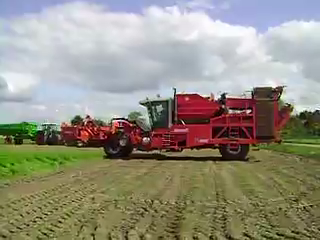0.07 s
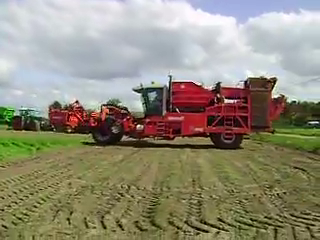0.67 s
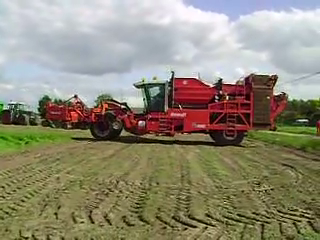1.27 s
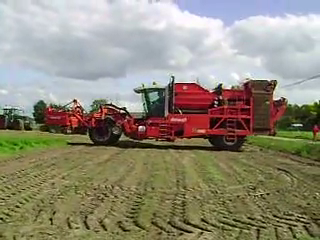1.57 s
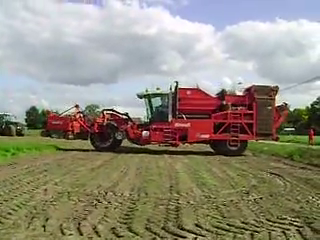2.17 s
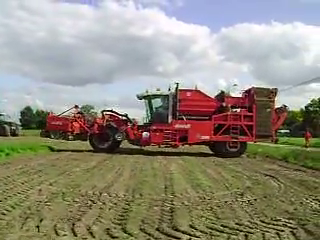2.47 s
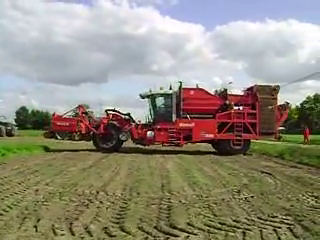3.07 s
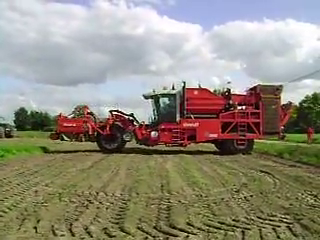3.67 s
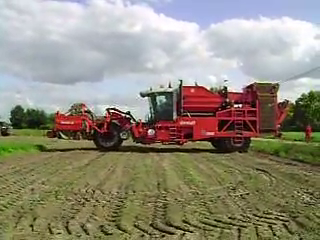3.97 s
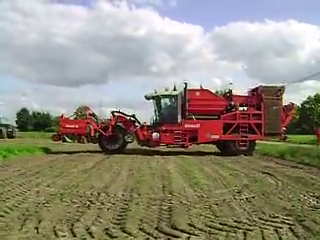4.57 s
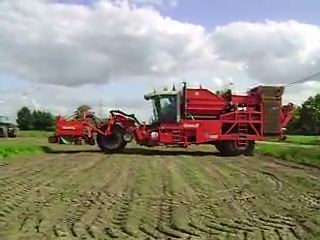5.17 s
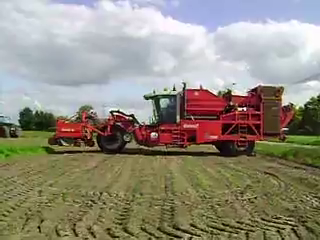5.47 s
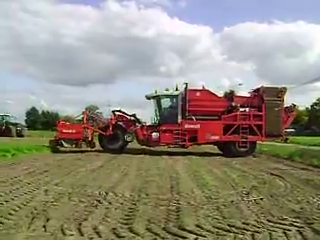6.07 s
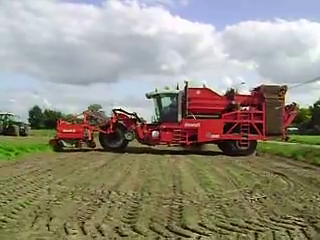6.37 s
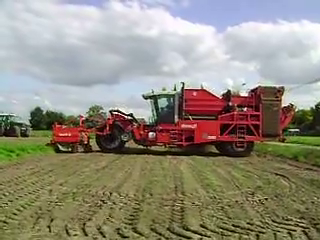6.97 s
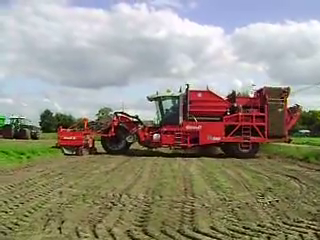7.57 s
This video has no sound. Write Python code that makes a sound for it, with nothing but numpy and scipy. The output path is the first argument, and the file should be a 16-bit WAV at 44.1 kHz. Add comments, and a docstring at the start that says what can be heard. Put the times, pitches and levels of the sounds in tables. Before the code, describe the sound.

Outdoors on a gusty field, a harvester's diesel engine drones with a booming exhaust and a grainy rush of machinery. Through the middle, ragged wind buffets and overloads the small microphone, partly covering the engine as it slows and drops in pitch. The engine then picks up speed again and runs steadily as the gusts fade, with a rising level of whine and a few faint, brief belt squeals.

```python
"""An open field on a gusty day, with a big diesel harvester working some way off.
Its exhaust throbs and booms as the engine sags under load and picks up again. Gears and a pump whine
in step with it, belts and bearings sing, and the conveyors rattle and clank.
Close up, wind rumbles, tears and slaps at the microphone of a small camera,
which overloads and keeps little treble."""
import sys
import numpy as np
from scipy.fft import rfft, irfft, next_fast_len
from scipy.io import wavfile
from scipy.ndimage import uniform_filter1d, map_coordinates

SR = 44100
rng = np.random.default_rng(int(sys.argv[2]) if len(sys.argv) > 2 else 0)


def inscribe(sig):
    """Save sig as 16-bit PCM at rate SR to the path in sys.argv[1].

    A 1-D sig is mono; a 2-D sig holds one channel per row.
    Samples are clipped to [-1, 1] before scaling.
    """
    pcm = np.round(np.clip(np.atleast_2d(sig).T, -1, 1) * 32767)
    wavfile.write(sys.argv[1], SR, pcm.astype(np.int16))


N = 344421
TIME_S = np.arange(N) / SR


def amp(db):
    """Decibels to gain."""
    return 10 ** (np.asarray(db) / 20)


def unit(x):
    """x scaled to rms 1."""
    return x / np.sqrt(np.mean(x ** 2) + 1e-20)


def noise():
    """White noise."""
    return rng.standard_normal(N)


def curves(rows):
    """One value per sample for each column after the time."""
    times, *columns = np.transpose(rows)
    return [np.interp(TIME_S, times, column) for column in columns]


def wobble(rate):
    """A smooth random curve, rate knots a second."""
    return map_coordinates(rng.standard_normal(int(N * rate / SR) + 4), [TIME_S * rate])


def swell(middle, length):
    """A rounded rise and fall of height 1."""
    return np.sqrt(np.maximum(1 - (2 * (TIME_S - middle) / length) ** 2, 0))


def swells(rows):
    """The joint gain of swells whose powers add."""
    return np.sqrt(sum((amp(db) * swell(middle, length)) ** 2 for middle, length, db in rows))


def filtered(x, response):
    """x through a frequency response."""
    size = next_fast_len(N + SR // 2)
    return irfft(rfft(x, size) * response(np.fft.rfftfreq(size, 1 / SR)), size)[:N]


def coloured(x, points):
    """x shaped by (freq_hz, level_db) points on a log axis, at rms 1."""
    freqs, db = np.transpose(points)
    return unit(filtered(x, lambda hz: amp(np.interp(np.log(hz + 1), np.log(freqs), db))))


def tones(firings, orders, waver_db, drift_rad, rate):
    """Tones locked to the crankshaft, each wavering in level and phase."""
    out = np.zeros(N)
    for order, db in orders:
        gain = amp(db + waver_db * wobble(rate))
        phase = 2 * np.pi * (order * firings + rng.random())
        out += gain * np.sin(phase + drift_rad * wobble(rate))
    return np.sqrt(2) * out


# Gusts striking the microphone: start_s, hold_s, level_db
GUSTS = [(0.079, 0.12, -21), (2.049, 0.073, -13), (2.236, 0.089, -14.5), (2.405, .05, -12.5),
         (2.63, .03, -19), (2.748, 0.16, -19), (3.071, .08, -13), (3.221, .18, -15.5), (3.442, 0.19, -13.5),
         (3.855, 0.2, -22), (4.098, 0.035, -17), (4.248, 0.011, -19.5), (4.33, 0.037, -20),
         (4.478, .11, -12), (4.774, 0.028, -15.5), (5.083, 0.03, -16.5), (5.595, 0.022, -17),
         (5.792, .14, -18), (6.03, .04, -16.5), (6.372, 0.023, -22), (7.184, 0.04, -20.5)]

def gusts(attack_s=0.032, release_s=0.035):
    """Wind strength: each gust rises quickly, holds and dies away; their powers add."""
    power = np.zeros(N)
    for start, hold, db in GUSTS:
        rise = np.clip(1 + (TIME_S - start) / attack_s, 0, 1)
        fall = np.exp(-np.maximum(TIME_S - start - hold, 0) / release_s)
        power += (amp(db) * rise * fall) ** 2
    return np.sqrt(power)


# The breeze between gusts: time_s, level_db
BREEZE = [(.3, -22.5), (.8, -30.5), (1.5, -30), (2, -22), (3, -19.5), (3.75, -16.5), (4.2, -22.5),
          (4.7, -16.5), (5.6, -19.5), (6.1, -22), (6.7, -32.5), (7.8, -31.5)]
# Slow eddies around the camera: time_s, relative_db
EDDIES = [(0.07, -39.5), (1.21, -51), (2.31, -20.5), (2.95, -35), (3.0, -28), (4.83, -32.5), (5.0, -44.5),
          (6.1, -32), (6.79, -46), (7.15, -31), (7.8, -38)]
# Air tearing at the microphone port: freq_hz, density_db
TEARING_SPECTRUM = [(40, -14.5), (95, 1.5), (170, 2), (300, 2), (800, -2.5), (1200, -7), (1700, -13.5),
                    (2500, -23), (3800, -31), (5200, -32.5), (6000, -52)]
# The eddies' rumble: freq_hz, density_db
RUMBLE_SPECTRUM = [(10, -19), (25, -2), (45, 0.5), (90, -3.5), (160, -7), (400, -24.5), (1500, -59)]

def wind(pops_per_s=330):
    """Right on the microphone, eddies rumble while breeze and gusts tear in ragged bursts."""
    gust = gusts()
    flow = np.hypot(amp(curves(BREEZE)[0] + 0.88 * wobble(14)), gust)
    ragged = amp(1.87 * wobble(130) + 0.55 * wobble(28))
    tearing = amp(1) * coloured(noise() * ragged, TEARING_SPECTRUM)
    # the overloaded microphone crackles in dense fine pops that grow with the wind
    pops = (rng.random(N) < pops_per_s / SR) * np.sign(noise()) * rng.uniform(0.24, 1, N)
    crackle = amp(-14) * coloured(pops * ragged, [(300, -5.5), (1200, 6), (2600, 6.5), (5200, -1)])
    eddy_gain = np.hypot(amp(curves(EDDIES)[0] + 3.5), amp(-12.5) * gust)
    rumble = eddy_gain * coloured(noise() * amp(2.2 * wobble(13)), RUMBLE_SPECTRUM)
    return flow * (tearing + crackle) + rumble


# Slaps of air on the microphone: start_s, level_db
SLAPS = [(2.0712, -13), (2.309, -15), (2.4264, -12), (2.6244, -12.5), (3.114, -9.5), (3.4469, -9.5),
         (3.4873, -6), (3.5508, -11.5), (3.6499, -11), (3.8105, -13), (4.5475, -10.5), (4.564, -9),
         (4.774, -13.5), (5.1311, -15.5), (5.9824, -15), (6.042, -15.5)]

def air_slaps(t60_s=0.015):
    """The hardest eddies hit the port as brief, broad cracks."""
    bursts, t = np.zeros(N + SR), np.arange(SR // 12) / SR
    for start, db in SLAPS:
        bursts[round(start * SR):][:len(t)] += amp(db - 60 * t / t60_s)
    return bursts[:N] * coloured(noise(), [(100, 0), (900, -1), (2400, -6), (5500, -9), (8000, -30)])


# Thin squeals from across the field: middle_s, length_s, pitch_hz, glide_hz_per_s, level_db
SQUEALS = [(0.177, 0.51, 2344, -1, -42), (0.192, 0.48, 1610, 1, -37.5), (0.516, 0.23, 1328, -40, -36),
           (0.786, 0.63, 1360, -42, -42), (4.98, 0.4, 2270, 88.5, -39), (5.209, 0.38, 2925, 28, -44),
           (6.52, 0.59, 1290, 3, -35), (7.738, 0.25, 1610, 27.5, -31.5)]

def squeals():
    """Belts and bearings sing for a moment, sliding a little in pitch."""
    out = np.zeros(N)
    for middle, length, hz, glide, db in SQUEALS:
        t = TIME_S - middle
        phase = 2 * np.pi * (hz + glide * t / 2) * t
        out += amp(db) * swell(middle, length) * np.sin(phase + .4 * wobble(25))
    return np.sqrt(2) * out


# Blows on the conveyor: start_s, relative_db
CLANKS = [(0.195, -13), (0.3537, -6.5)]
# The modes of its steel: pitch_hz, level_db, t60_s
STEEL_MODES = [(1690, -2, 0.044), (2724, -4.5, 0.034), (2940, -4.5, 0.034), (3530, -8.5, 0.028),
               (4700, -7, .03)]

def conveyor_clanks(gain_db=-12.5, crack_t60_s=0.011):
    """Short blows crack against the conveyor and ring its steel."""
    out, t = np.zeros(N + SR), np.arange(SR // 8) / SR
    for start, db in CLANKS:
        ring = sum(amp(level - 60 * t / t60) * np.sin(2 * np.pi * (hz * t + rng.random()))
                   for hz, level, t60 in STEEL_MODES)
        crack = 1.5 * amp(-60 * t / crack_t60_s) * rng.standard_normal(len(t))
        out[round(start * SR):][:len(t)] += amp(db + gain_db) * (ring + crack)
    return out[:N]


# The hydraulic drive taking up load near the end: time_s, level_db
PUMP_LEVEL = [(0, -46), (2, -50), (5.8, -50), (6.4, -41), (7.15, -41), (7.35, -30), (7.8, -28.5)]
# Its tones: firing_multiple, relative_db
PUMP_TONES = [(8.5, 1.5), (17, -13), (18.42, -13), (6.33, -18.5)]

def hydraulic_pump(firings):
    """The pump whines in step with the engine."""
    return amp(curves(PUMP_LEVEL)[0]) * tones(firings, PUMP_TONES, waver_db=3, drift_rad=.15, rate=13)


# Swells of gear whine: middle_s, length_s, level_db
WHINE_SWELLS = [(.28, .8, -36), (1.8, 1, -43), (2.95, .5, -37), (4.5, 1.2, -37.5), (4.8, .14, -32),
                (5.6, .9, -37), (6.54, .15, -30.5), (6.85, .3, -32), (7.6, .7, -30)]
# Shafts geared to the engine: firing_multiple, relative_db
GEAR_TONES = [(22.63, 1), (24.95, -14), (25.5, -16), (38.2, -12.5)]

def gear_whine(firings, floor_db=-50):
    """The gears follow the engine's speed, always faintly there and swelling now and then."""
    gain = np.hypot(amp(floor_db), swells(WHINE_SWELLS))
    return gain * tones(firings, GEAR_TONES, waver_db=1.6, drift_rad=.25, rate=25)


def clatter(firings, cylinders=6, size=3072, knock_gain=0.26):
    """Noise plus each cylinder's own ragged knock, which returns every engine cycle."""
    hiss, cycle = noise(), rng.standard_normal(size)
    knock = unit(map_coordinates(cycle, [(firings / cylinders % 1) * size], mode="grid-wrap"))
    return hiss + knock_gain * knock


# An engine bay panel, louder as it comes into line with the microphone: time_s, level_db
PANEL_LEVEL = [(0, -30.5), (0.5, -45.5), (0.9, -56.5), (5.5, -43.5), (6.5, -35.5), (7.2, -32), (7.8, -31)]

def bay_panel(firings, centre_hz=1975, width_hz=510):
    """Each firing shakes a panel, which rings in one steep-sided resonance."""
    def resonance(hz):
        damping = 1j * hz * width_hz
        return (damping / (centre_hz ** 2 - hz ** 2 + damping)) ** 2
    shaking = clatter(firings) * amp(2.4 * np.cos(2 * np.pi * firings))
    return amp(curves(PANEL_LEVEL)[0]) * unit(filtered(shaking, resonance))


# The level of the machinery's rush, dipping and surging during the gusts: time_s, relative_db
RUSH_LEVEL = [(0.3, -34), (0.74, -37.5), (2.07, -36), (2.24, -34.5), (2.66, -38.5), (3.43, -32.5),
              (4.23, -41), (4.6, -36), (7.25, -32.5), (7.8, -31)]
# Fan, belts and conveyors together: freq_hz, density_db
RUSH_SPECTRUM = [(30, -13), (105, -9.5), (290, 2), (420, -8.5), (650, -1), (860, -5.5), (1100, -2),
                 (1480, -10), (2100, -10), (2500, -21), (3400, -16), (4300, -18.5), (5100, -17.5),
                 (6000, -35)]

def machinery_rush(firings, gain_db=9.5):
    """The machinery's rush pulses with each firing; chains and stones make it grainy."""
    shaking = clatter(firings)
    rattle = amp(1.7 * np.cos(2 * np.pi * firings) + 1.6 * wobble(250) + 1.2 * wobble(23))
    return amp(curves(RUSH_LEVEL)[0] + gain_db) * coloured(shaking * rattle, RUSH_SPECTRUM)


def effort_db(firing_hz, cruise_hz=86, db_per_hz=0.88, throttle_db=3, full_throttle_hz_per_s=14):
    """The exhaust grows with engine speed, and with the throttle that speeds it up."""
    rise_hz_per_s = uniform_filter1d(np.gradient(firing_hz) * SR, SR // 5)
    throttle = np.tanh(rise_hz_per_s / full_throttle_hz_per_s)
    return db_per_hz * (firing_hz - cruise_hz) + throttle_db * throttle


# The tailpipe's slowly drifting levels at cruising speed: time_s, throb_db, boom_db
TAILPIPE = [(0, -19, -22.5), (2.4, -17.5, -25.5), (5.8, -19.5, -24.5), (7.4, -17.5, -26)]
# The throb's tones: firing_multiple, relative_db
EXHAUST_TONES = [(1, 0), (5 / 3, -14), (2, -11.5), (8 / 3, -15), (10 / 3, -25.5), (4, -23), (6, -21)]
# A bark as the governor catches the sag: middle_s, length_s, level_db
BARKS = [(3.88, .16, -21.5)]
# The silencer booming out briefly: middle_s, length_s, level_db
BOOM_SWELLS = [(.15, 0.14, -18.5), (1.33, .1, -20), (3.58, .14, -16.5), (6.63, 0.091, -19.5)]
# Gas in the silencer: freq_hz, density_db
BOOM_SPECTRUM = [(90, -36.5), (116, -15.5), (134, 1), (152, -2), (176, -2), (196, -12), (260, -24.5),
                 (400, -48.5)]

def exhaust(firings, effort, boom_follows=0.34):
    """Every firing pushes a puff from the tailpipe, and turbulent gas booms in the silencer."""
    throb_db, boom_db = curves(TAILPIPE)
    throb_gain = amp(throb_db + effort) + swells(BARKS)
    throb = throb_gain * tones(firings, EXHAUST_TONES, waver_db=.5, drift_rad=0.046, rate=25)
    boom_gain = np.hypot(amp(boom_db + boom_follows * effort + 2.5 * wobble(10)), swells(BOOM_SWELLS))
    return throb + boom_gain * coloured(noise(), BOOM_SPECTRUM)


# The diesel sags under load, recovers slowly, then revs up: time_s, firing_hz
ENGINE_SPEED = [(.3, 88.9), (1.3, 83.26), (2.65, 83.05), (3.7, 70.46), (4.7, 75.7), (5.65, 78.04),
                (5.92, 86.45), (6.4, 85.86), (7.8, 86.05)]

def harvester():
    """One diesel paces the exhaust, machinery, panel, gears and pump."""
    firing_hz, = curves(ENGINE_SPEED)
    firings = np.cumsum(firing_hz * (1 + .0008 * wobble(12))) / SR  # running count
    return (exhaust(firings, effort_db(firing_hz)) + machinery_rush(firings) + bay_panel(firings)
            + gear_whine(firings) + hydraulic_pump(firings))


def scene():
    """The machine across the field and the wind at the microphone, in mono."""
    return (harvester() + squeals() + conveyor_clanks() + wind() + air_slaps())[None]


def record(dry, on_s=0.056, fade_s=0.016, knee=0.94, top_hz=5680, ceiling=0.72):
    """The camera fades in, rounds off the hardest gusts, cuts the treble and clips the tallest peaks."""
    fade = np.clip((TIME_S - on_s) / fade_s + .5, 0, 1)
    rounded = dry[0] / (1 + (dry[0] / knee) ** 4) ** (1 / 4)
    dull = filtered(rounded * fade, lambda hz: 1 / np.sqrt(1 + (hz / top_hz) ** 72))
    clipped = np.clip(dull, -ceiling, ceiling)
    return filtered(clipped, lambda hz: hz < 15800)[None]


dry = scene()
out = record(dry)
inscribe(out)
```